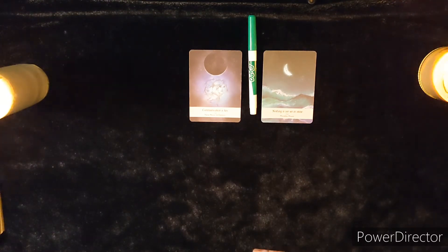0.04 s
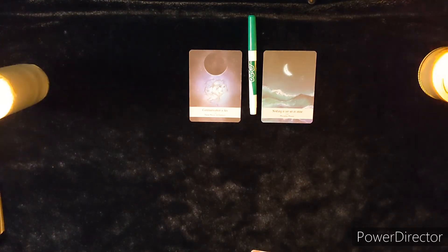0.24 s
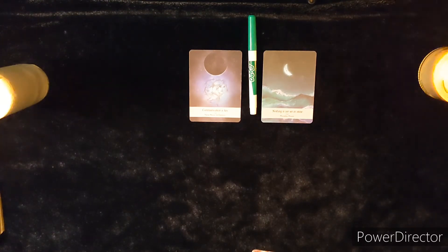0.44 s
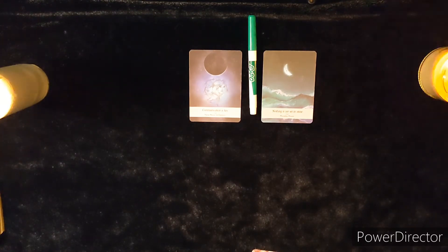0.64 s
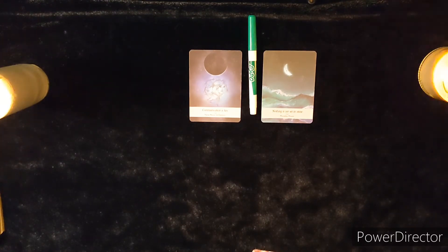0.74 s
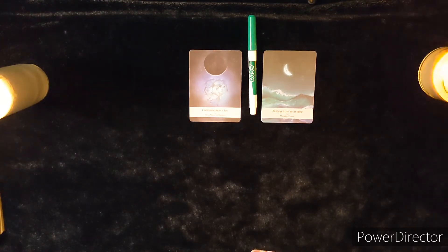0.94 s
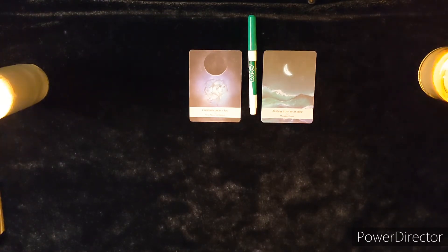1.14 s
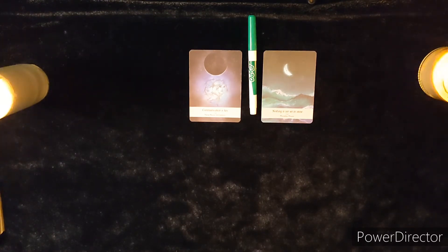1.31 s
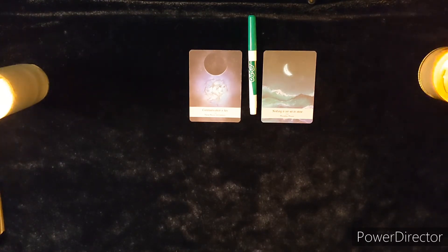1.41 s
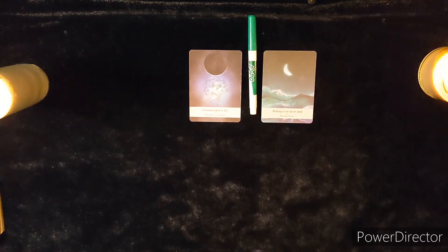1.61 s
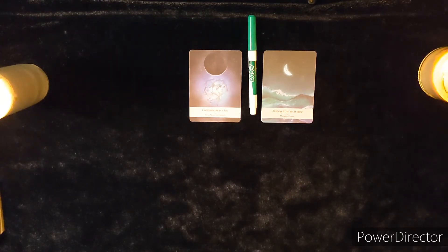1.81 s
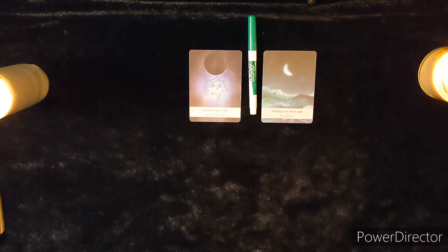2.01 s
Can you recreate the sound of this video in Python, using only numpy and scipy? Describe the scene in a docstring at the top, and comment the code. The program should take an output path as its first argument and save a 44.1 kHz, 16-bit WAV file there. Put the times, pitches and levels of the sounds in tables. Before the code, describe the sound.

A deck of cards is shuffled by hand, close, in a small room. After near quiet, snaps and knocks start around 0.2 s, with strong bright clicks near 0.5 and 0.6 and a tight papery burst at 0.72-0.77. More snaps and a dull palm drop come around 0.9. After a lull, softer taps and short dragging scrapes run 1.3-1.85, then fade into faint rumble and hum.

```python
"""A deck of cards is shuffled by hand over a cloth-covered table in a small room.
First, card edges snap (sharp clicks ringing each card), packets knock (pushes ringing the deck) and
faces slide with a papery hiss (grainy noise). Near 0.9 s the deck drops softly against the palm: a dull
swing. Then it is pushed square more gently, with dragging scrapes made of short runs of tiny slips.
Throughout, a low room rumble (shaped noise) and a faint hum (a steady sine) lie underneath."""
import sys
import numpy as np
from scipy import signal
from scipy.fft import rfft, irfft
from scipy.io import wavfile

SR = 44100
rng = np.random.default_rng(int(sys.argv[2]) if len(sys.argv) > 2 else 0)


def persist_wave(psi):
    """Save psi, clipped to +-1, as 16-bit WAV."""
    counts = np.round(np.clip(psi, -1, 1) * 32767).astype(np.int16)
    wavfile.write(sys.argv[1], SR, np.atleast_2d(counts).T)


N = 92610  # samples: 2.1 s


def from_db(db):
    """Decibels to gain."""
    return 10 ** (np.asarray(db) / 20)


def rms_one(x):
    """Scale to an rms (average strength) of 1."""
    return x / np.sqrt(np.mean(x ** 2) + 1e-20)


def unit_energy(x):
    """Scale so that the squares of all samples add up to 1."""
    return x / np.sqrt(np.sum(x ** 2) + 1e-20)


def level_curve(rows):
    """Gain at every sample, from (time_s, level_db) points joined by straight lines."""
    times_s, levels_db = np.transpose(rows)
    return from_db(np.interp(np.arange(N) / SR, times_s, levels_db))


def at_hz(points, hz):
    """Read a table between its points on a log-frequency axis."""
    table_hz, values = np.transpose(points)
    return np.interp(np.log(np.maximum(hz, 1)), np.log(table_hz), values)


def colour(x, points):
    """Shape a steady noise by a spectrum, then scale it to rms 1."""
    gain = from_db(at_hz(points, np.fft.rfftfreq(N, 1 / SR)))
    return rms_one(irfft(rfft(x) * gain, N))


def stereo_noise(likeness, size):
    """White noise whose two channels are as alike as the table says: a shared and an opposed part."""
    mid, side = rfft(rng.standard_normal((2, size)))
    alike = np.clip(at_hz(likeness, np.fft.rfftfreq(size, 1 / SR)), -1, 1)
    shared = np.sqrt((1 + alike) / 2) * mid
    opposed = np.sqrt((1 - alike) / 2) * side * [[1], [-1]]
    return irfft(shared + opposed, size)


def pan(db):
    """Left and right gains for a left-minus-right level difference."""
    return from_db(np.array([[db], [-db]]) / 2)


def resonate(x, hz, width_hz):
    """A resonance with gain 1 at its top; the wider it is, the sooner it dies away."""
    r = np.exp(-np.pi * width_hz / SR)
    feedback = [1, -2 * r * np.cos(2 * np.pi * hz / SR), r * r]
    return signal.lfilter(np.array([1, 0, -1]) * (1 - r * r) / 2, feedback, x)


def ring(x, hz, t60):
    """A unit click sets a sine ringing from height 1; it falls by 60 dB in t60 seconds."""
    r = np.exp(-np.log(1000) / (t60 * SR))
    w = 2 * np.pi * hz / SR
    return signal.lfilter([0, np.sin(w)], [1, -2 * r * np.cos(w), r * r], x)


def add(out, s, sound):
    """Mix a short sound in at time s."""
    i = max(int(s * SR), 0)
    out[..., i:i + sound.shape[-1]] += sound[..., :N - i]


LEAD_S = .005  # longest lead of the slips before a contact
LEAD_SHARE = .6  # build-up time of the slips as a share of their dying time
CHATTER_PER_DB = 0.4  # gentler is more scrape than crack: dB of chatter gained per dB of level lost


def contact(chatter_db, chatter_s, size=3000):
    """Tiny slips build up to one sharp push, LEAD_S in, and die away after it."""
    t = np.arange(size) / SR - LEAD_S
    fade = np.exp(-np.maximum(t, -t / LEAD_SHARE) / chatter_s)
    force = from_db(chatter_db) * rng.standard_normal(size) * fade
    force[int(LEAD_S * SR)] = 1
    return force + 1e-18  # keeps the filters clear of extremely small numbers


def slips(per_s, spread_db, size):
    """Random clicks of uneven size and either sign; rms 1."""
    size_db = spread_db * np.minimum(rng.exponential(1, size), 3)
    clicks = from_db(size_db) * rng.choice([-1, 1], size)
    return rms_one(clicks * (rng.random(size) < per_s / SR))


# a card edge snaps free: start_s, energy_db (before the room), ring_hz,
# crack_db (gain of the broad crack in the mix), pan_db (left minus right)
SNAPS = [(.112, -32, 3700, -30, 11), (.181, -25.5, 11000, -9, 6), (0.2205, -6.5, 9400, 5, 0),
         (0.2297, -8, 5060, 22, 21), (.2865, -21, 7560, 18, 24), (0.3, -23.5, 10000, 13, 11.5),
         (.360, -17.5, 7000, 24, 1.5), (0.416, -40, 8000, 17, 13), (0.457, -17, 8100, -10, 3.5),
         (0.488, 5.5, 8500, -27, 1), (0.5237, -5, 8900, -11, 0), (0.5365, -5.5, 8300, 6, -1.5),
         (.561, -7, 8350, -14.5, 3), (0.6124, 6.5, 7450, -2, 0), (0.7192, 6, 9800, -9.5, -3),
         (0.7483, -7.5, 8200, -6, 22), (0.752, 1.5, 9800, -22, -1), (0.7595, 1, 8350, -7, -14.5),
         (0.7683, 3, 8800, -17, 0), (.8544, 4, 7900, -7.5, -6.5), (0.8572, -21.5, 7050, -14, -30),
         (0.9213, -6.5, 7300, 11, -7.5), (0.9455, -6.5, 7400, 18, 4), (0.9522, -3, 6900, -1, -7),
         (1.160, -15.5, 10100, -13, -3.5), (1.430, -16.5, 7640, -25, 0), (1.5054, -9, 8400, 4, 7.5),
         (1.868, -29, 7900, -9, -4)]
# how a single card rings besides its main ring: pitch_hz (before its bend), width_hz, gain_db
CARD_MODES = [(2670, 250, -6.5), (4220, 770, -16.5), (14400, 1500, -11.5)]
RING_WIDTH_HZ, CRACK_LOW_HZ, CRACK_HIGH_HZ = 2870, 483, 8200
FULL_SNAP_DB = 9  # a snap this strong has exactly the chatter below
SNAP_CHATTER_DB, SNAP_CHATTER_S = -21, .0006  # slips around the snap: level, dying time
CARD_DETUNE = .05  # each card is bent differently: spread of its modes in octaves


def snaps():
    """Each freed edge gives a broad crack and rings the card for a few cycles."""
    out = np.zeros((2, N))
    crack_band = signal.butter(1, [CRACK_LOW_HZ, CRACK_HIGH_HZ], "band", fs=SR, output="sos")
    for start_s, energy_db, ring_hz, crack_db, pan_db in SNAPS:
        chatter_db = SNAP_CHATTER_DB + CHATTER_PER_DB * (FULL_SNAP_DB - energy_db)
        force = contact(chatter_db, SNAP_CHATTER_S)
        bend = 2 ** (CARD_DETUNE * rng.standard_normal())
        card = resonate(force, ring_hz, RING_WIDTH_HZ)
        for hz, width_hz, gain_db in CARD_MODES:
            card = card + from_db(gain_db) * resonate(force, hz * bend, width_hz)
        crack = from_db(crack_db) * signal.sosfilt(crack_band, force)
        snap = np.sqrt(2) * unit_energy(off_hands(card + crack))  # root 2: energy 1 for each channel
        add(out, start_s - LEAD_S, from_db(energy_db) * pan(pan_db) * snap)
    return out


# packets of cards knock together: start_s, thud_db and clack_db (energies before any reflections),
# clack_hz (pitch of the clack)
KNOCKS = [(.192, -11, -18, 1140), (.2215, -19, -20, 990), (.2288, -15, -8.5, 910), (0.2863, -4.5, -6, 870),
          (.301, -14, -13, 900), (.315, -13, -11.5, 820), (.3432, -19, -12.5, 1290), (.3502, -18, -13, 696),
          (.360, -19, -15, 970), (.401, -16, -30, 1100), (.4145, -16.5, -7, 1040), (.446, -13, -10.5, 930),
          (.455, -23, -12, 1110), (.6078, -6, -0.5, 920), (.6123, -9, -19.5, 1320), (.661, -25, -27, 800),
          (.6748, -12, -13, 1050), (.719, -23.5, -9, 1240), (.7679, -16.5, -23, 900),
          (.921, -17, -17, 1230), (.9446, -16, -27, 900), (.9517, -20, -16, 1280),
          (1.39, -23.5, -27.5, 624), (1.431, -22.5, -16.5, 840), (1.5055, -23, -16.5, 1530),
          (1.631, -20, -14, 1230), (1.676, -24, -16, 1120), (1.725, -16.5, -16.5, 1080),
          (1.820, -16.5, -9.5, 1460), (1.828, -19.5, -13, 980)]
# how the deck in the hand rings: pitch_hz, gain_db (before the random spread), t60_s (time to fall 60 dB)
DECK_MODES = [(122, -4, 0.043), (308, -36, 0.072), (397, 0.5, 0.037), (548, -26, 0.0076), (621, 8.5, 0.015),
              (900, 6, 0.024)]
# clack of the stacked edges: multiple of clack_hz, width_hz, gain_db (before the random spread)
CLACK_MODES = [(1, 620, 9), (1.549, 895, -2), (2.4, 1080, -8.5)]
KNOCK_CHATTER_DB, KNOCK_CHATTER_S = -25, .0025  # slips at a clack of 0 dB: level, dying time
STRIKE_SPREAD_DB = 2  # each landing excites the modes a little differently
THUD_LOW_CUT_HZ = 137


def knocks():
    """A packet lands: the deck thuds and its stacked edges clack; gentler clacks have more chatter."""
    out = np.zeros(N)
    low_cut = signal.butter(2, THUD_LOW_CUT_HZ, "high", fs=SR, output="sos")
    for start_s, thud_db, clack_db, clack_hz in KNOCKS:
        force = contact(KNOCK_CHATTER_DB - CHATTER_PER_DB * clack_db, KNOCK_CHATTER_S)
        thud, clack = 0, 0
        for hz, gain_db, t60_s in DECK_MODES:
            thud = thud + from_db(gain_db + rng.normal(0, STRIKE_SPREAD_DB)) * ring(force, hz, t60_s)
        thud = signal.sosfilt(low_cut, thud)
        for multiple, width_hz, gain_db in CLACK_MODES:
            gain = from_db(gain_db + rng.normal(0, STRIKE_SPREAD_DB))
            clack = clack + gain * resonate(force, multiple * clack_hz, width_hz)
        knock = from_db(thud_db) * unit_energy(thud) + from_db(clack_db) * unit_energy(clack)
        add(out, start_s - LEAD_S, knock)
    return out


def friction(level, spectrum, grains_per_s, spread_db, smooth, width):
    """Paper fibres catch and slip: uneven grains on a smooth hiss, spread along the card edge."""
    mid = slips(grains_per_s, spread_db, N) + smooth * rng.standard_normal(N)
    side = slips(grains_per_s, spread_db, N) + smooth * rng.standard_normal(N)
    return level_curve(level) * colour(mid + width * side * [[1], [-1]], spectrum)


# loudness of the sliding card faces: time_s, level_db (before the room)
SLIDE = [(0, -72), (.17, -66.5), (.235, -35), (.29, -47), (.39, -55), (.48, -47), (.505, -46.5),
         (.56, -36.5), (.60, -47.5), (.70, -56), (.765, -25.5), (.82, -49.5), (.885, -38), (.915, -46),
         (.96, -32), (1.04, -65), (1.125, -64.5), (1.155, -47), (1.20, -61), (1.27, -55), (1.34, -47),
         (1.41, -52.5), (1.49, -46.5), (1.52, -44), (1.70, -45), (1.84, -45), (1.91, -68), (2.1, -67.5)]
# tone of the sliding: pitch_hz, level_db (per Hz, relative)
SLIDE_COLOUR = [(300, -4), (900, -1.5), (2000, -4.5), (2700, 0), (3700, -2), (7000, 3), (10000, -1.5),
                (15000, -1.5)]


def slide():
    """Card faces slide: many fine grains and much smooth hiss, heard wide."""
    return friction(SLIDE, SLIDE_COLOUR, grains_per_s=1400, spread_db=3.4, smooth=.7, width=.9)


# loudness of fingers and packets rubbing: time_s, level_db (before the room)
RUB = [(0, -63.5), (.16, -52.5), (.24, -42.5), (.31, -38.5), (.385, -45.5), (.45, -44.5), (.57, -54),
       (.66, -43.5), (.82, -58), (.96, -44), (1.06, -60.5), (1.27, -53.5), (1.36, -54.5), (1.48, -50),
       (1.58, -47.5), (1.78, -55), (1.85, -49.5), (1.91, -58.5), (2.1, -61)]
# tone of the rubbing: pitch_hz, level_db (per Hz, relative)
RUB_COLOUR = [(60, -41), (170, -6.5), (280, 6), (550, 2.5), (900, -5.5), (1700, -9), (3000, -21),
              (8000, -51.5)]


def rub():
    """Fingers and packets rub: fewer grains, a duller tone, heard near the middle."""
    return friction(RUB, RUB_COLOUR, grains_per_s=400, spread_db=3.5, smooth=.35, width=.15)


THUMP_AT_S, THUMP_DB = .942, -10  # time, energy before any reflections
THUMP_HZ, THUMP_WIDTH_HZ = 248, 49


def thump():
    """The deck drops softly against the palm, which cushions it: a dull, quickly damped swing."""
    out = np.zeros(N)
    swing = resonate(signal.unit_impulse(4096), THUMP_HZ, THUMP_WIDTH_HZ)
    swing = resonate(swing, THUMP_HZ, 2 * THUMP_WIDTH_HZ)
    add(out, THUMP_AT_S, from_db(THUMP_DB) * unit_energy(swing))
    return out


# edges drag over the side of the deck: start_s, length_s (dying time),
# energy_db (before any reflections), ring_hz
SCRAPES = [(1.308, .012, -25, 1460), (1.343, 0.0067, -23, 1050), (1.553, 0.021, -15, 1630),
           (1.599, 0.016, -11.5, 1760), (1.726, 0.032, -17, 1950), (1.821, 0.018, -10.5, 2160),
           (1.98, 0.016, -26.5, 1019)]
SCRAPE_SLIPS_PER_S, SCRAPE_SPREAD_DB, SCRAPE_ATTACK_S = 650, 2.2, .001
SCRAPE_WIDTH_SHARE = 0.92  # width of the first resonance as a share of its pitch


def scrapes(size=4096):
    """A dragged edge stutters in a short run of slips that ring the packet."""
    out, t = np.zeros(N), np.arange(size) / SR
    for start_s, length_s, energy_db, ring_hz in SCRAPES:
        swell = (1 - np.exp(-t / SCRAPE_ATTACK_S)) * np.exp(-(t / length_s) ** 2)
        force = slips(SCRAPE_SLIPS_PER_S, SCRAPE_SPREAD_DB, size) * swell + 1e-18
        width_hz = SCRAPE_WIDTH_SHARE * ring_hz
        packet = resonate(resonate(force, ring_hz, width_hz), ring_hz, 2 * width_hz)
        add(out, start_s, from_db(energy_db) * unit_energy(packet))
    return out


SCATTER_DB, SCATTER_S, SCATTER_LOW_HZ = -4.5, .0004, 1560  # level, build-up and dying time, low cut


def off_hands(x, size=1024):
    """A sharp sound reflects off the hands and the deck, differently towards each microphone."""
    t = np.arange(size) / SR
    x = x * np.ones((2, 1))  # the same sound in both channels
    scatter = rng.standard_normal((2, size)) * (1 - np.exp(-t / SCATTER_S)) * np.exp(-t / SCATTER_S)
    low_cut = signal.butter(2, SCATTER_LOW_HZ, "high", fs=SR, output="sos")
    scatter = np.sqrt(2) * unit_energy(signal.sosfilt(low_cut, scatter))
    return x + from_db(SCATTER_DB) * signal.fftconvolve(x, scatter, axes=1)[:, :x.shape[1]]


# how strongly the room answers: pitch_hz, level_db
ROOM_LEVEL = [(100, -8.5), (300, -13), (900, -3.5), (2600, -2.5), (4000, -1.5), (8000, -4), (15000, -6.5)]
# how long the room rings: pitch_hz, t60_s (time to fall 60 dB)
ROOM_T60 = [(200, 0.2), (600, 0.16), (2500, 0.17), (8000, 0.19), (15000, 0.11)]
# how alike the room's left and right tails are: pitch_hz, likeness (-1 opposite to 1 same)
ROOM_LIKENESS = [(150, 0.099), (500, 0.68), (1200, -0.62), (2500, 0.22), (6000, -0.4)]
ROOM_BUILD_S, RIGHT_LAG_S = 0.0045, 0.00013  # build-up time of the tail, lag of the direct sound


def room(x, size=22050):
    """Direct sound reaches the left microphone first; a short diffuse tail follows."""
    t, hz = np.arange(size) / SR, np.fft.rfftfreq(size, 1 / SR)
    noise = rfft(stereo_noise(ROOM_LIKENESS, size))
    centres = np.geomspace(100, 16000, 12)  # overlapping bands, each with its own decay
    build = 1 - np.exp(-(t / ROOM_BUILD_S) ** 2)
    tail = 0
    for centre, weights in zip(centres, np.eye(len(centres))):
        band = irfft(noise * at_hz(np.c_[centres, weights], hz), size)
        decay = np.exp(-np.log(1000) * t / at_hz(ROOM_T60, centre))
        tail = tail + band * unit_energy(build * decay) * from_db(at_hz(ROOM_LEVEL, centre))
    lag = np.exp(-2j * np.pi * np.fft.rfftfreq(N, 1 / SR) * RIGHT_LAG_S)
    direct = np.array([x[0], irfft(rfft(x[1]) * lag, N)])
    return direct + signal.fftconvolve(x, tail, axes=1)[:, :N]


# tone of the room rumble: pitch_hz, level_db (per Hz, relative)
FLOOR_COLOUR = [(25, -39), (33, -23), (45, 7), (85, -1), (118, 5.5), (170, -10.5), (280, 11), (450, -3.5),
                (650, -1.5), (1100, -21), (3000, -20.5), (15000, -33.5)]
# how alike the rumble is left and right: pitch_hz, likeness (-1 opposite to 1 same)
FLOOR_LIKENESS = [(500, 0.97), (2000, 0.14)]
FLOOR_DB, HUM_HZ, HUM_DB = -54.5, 121, -66  # levels are rms, before the pan
FLOOR_PAN_DB = 1  # right minus left


def background():
    """Low room rumble from shaped noise, with a faint hum from a steady sine."""
    hum = from_db(HUM_DB) * rms_one(np.sin(2 * np.pi * HUM_HZ * np.arange(N) / SR))
    rumble = from_db(FLOOR_DB) * colour(stereo_noise(FLOOR_LIKENESS, N), FLOOR_COLOUR)
    return (rumble + hum) * pan(-FLOOR_PAN_DB)


def scene():
    """The cards in the room, over the background; each group of sounds has its own room reflections."""
    deck = off_hands(knocks() + scrapes() + thump())
    rubbing = slide() + rub()
    return room(snaps()) + room(deck) + room(rubbing) + background()


CUTOFF_HZ = 15600


def record(dry):
    """Peaks beyond full scale are flattened; then the treble above CUTOFF_HZ is cut steeply."""
    top_cut = signal.ellip(10, .1, 80, CUTOFF_HZ, fs=SR, output="sos")
    return signal.sosfilt(top_cut, np.clip(dry, -1, 1))


dry = scene()
out = record(dry)
persist_wave(out)
```